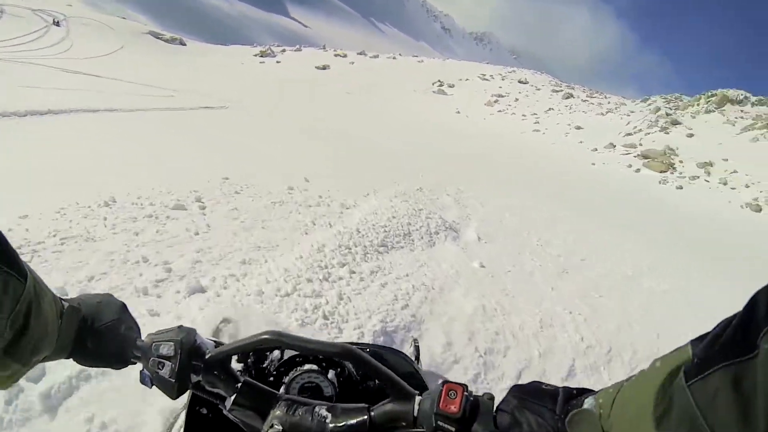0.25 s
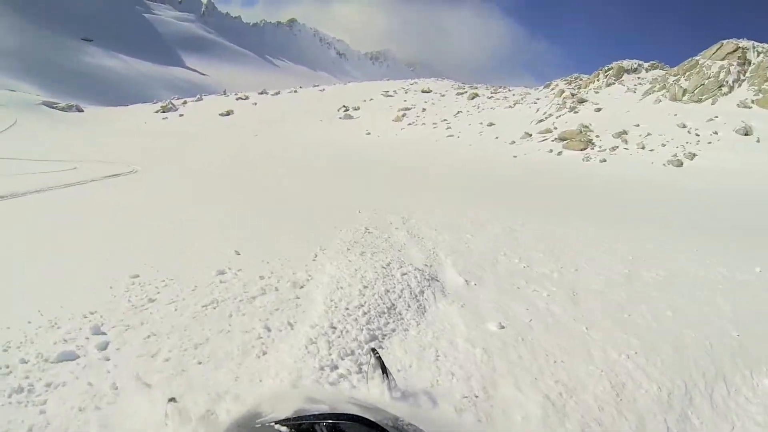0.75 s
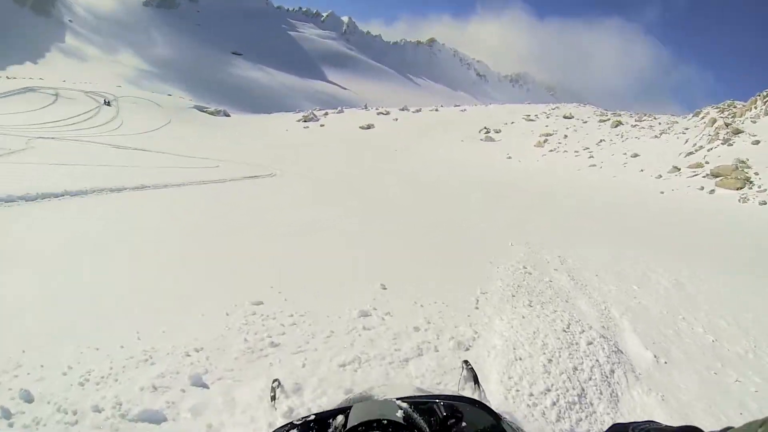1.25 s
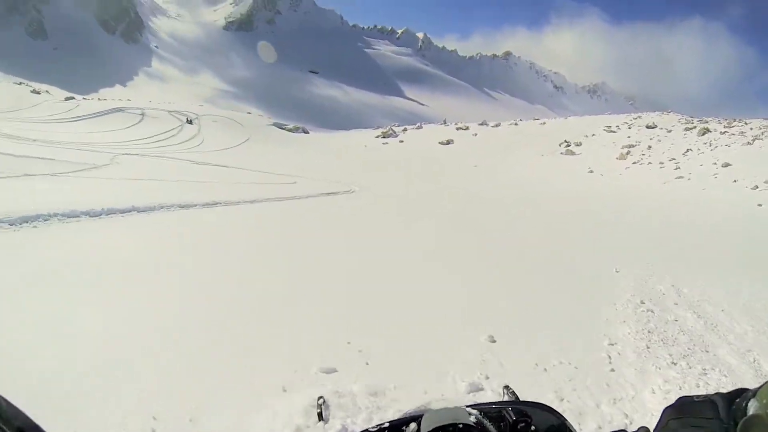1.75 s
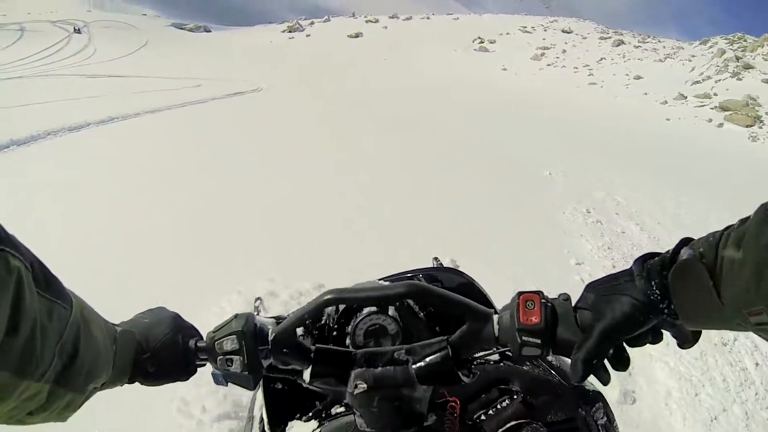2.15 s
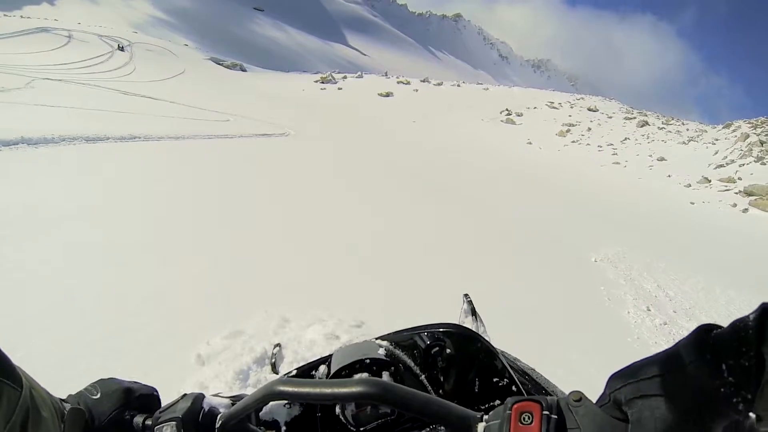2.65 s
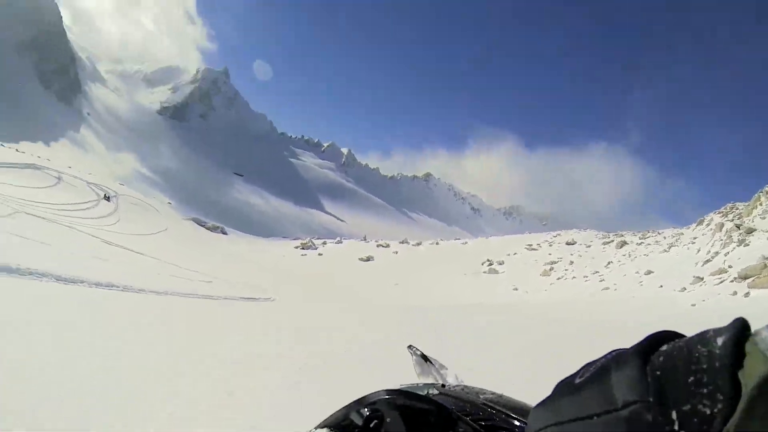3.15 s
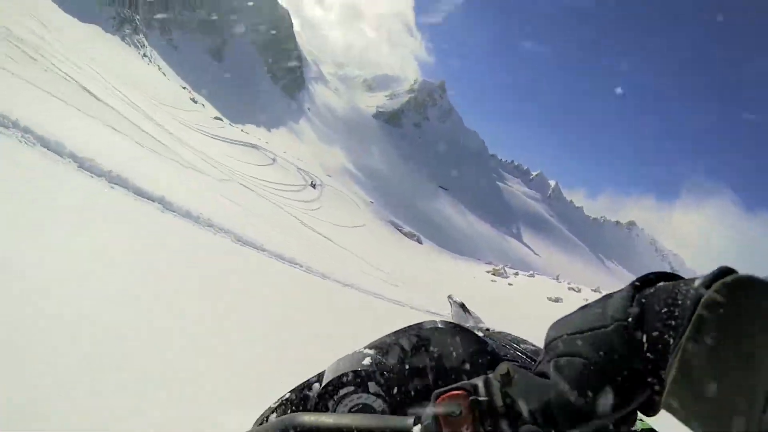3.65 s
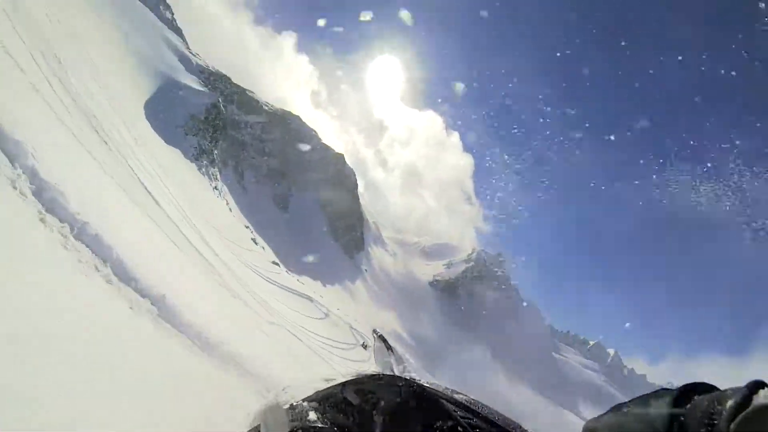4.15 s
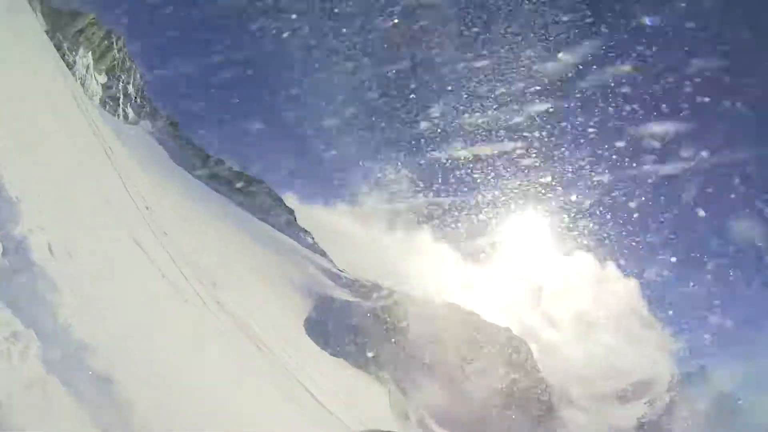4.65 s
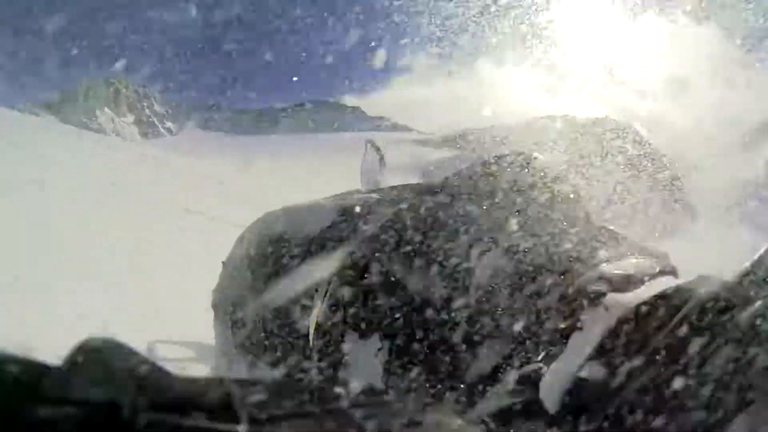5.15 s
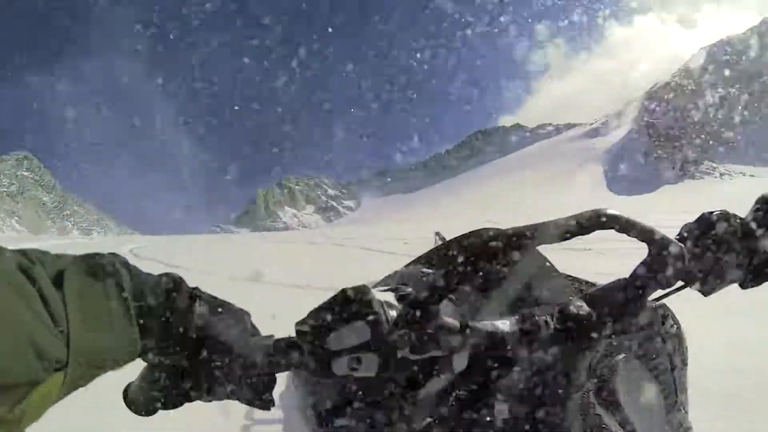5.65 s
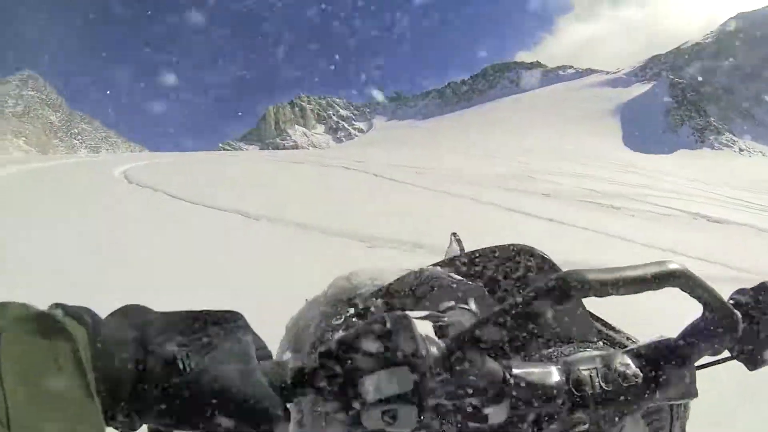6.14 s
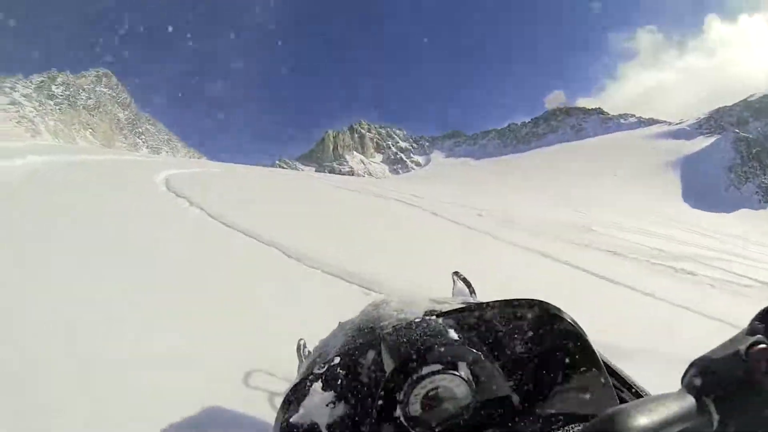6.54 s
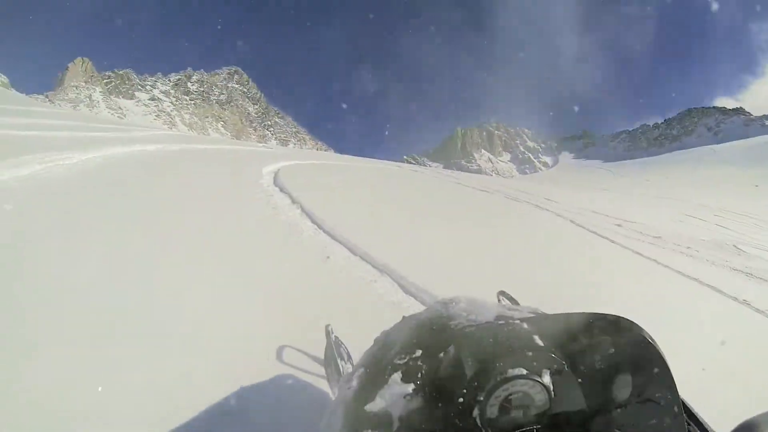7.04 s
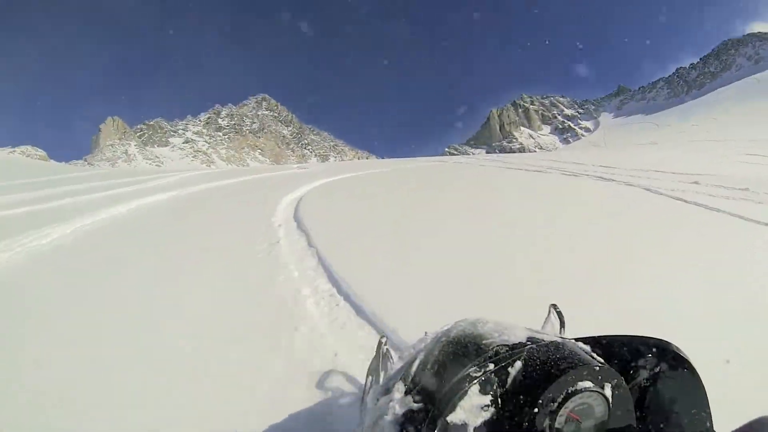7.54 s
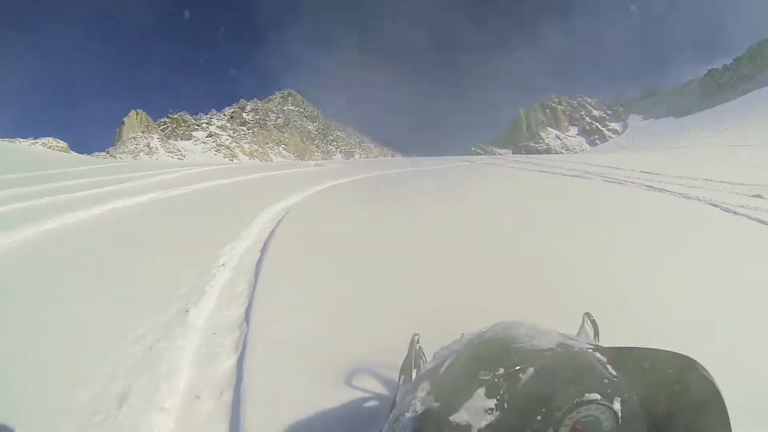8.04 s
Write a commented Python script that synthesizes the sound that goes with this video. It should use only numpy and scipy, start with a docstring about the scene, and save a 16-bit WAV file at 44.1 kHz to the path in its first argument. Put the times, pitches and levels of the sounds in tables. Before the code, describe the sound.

An enclosed microphone worn by the rider hears low wind buffeting and a soft uneven two-stroke idle with loose clutch chatter. After several solid knocks and a burst of tiny ticks, the throttle opens: pitch sweeps up within a second into a loud, steady full-load drone, rough roar and resonant whine. Gusts and a crackling spray of snow cross it around five seconds; the engine stays pinned outdoors on snow.

```python
"""Snowmobile climbing in deep snow

A two-stroke twin snowmobile idles in the wind, then takes full throttle and climbs through deep snow.
The exhaust drones on low crank orders (tones at whole multiples of the crankshaft's turning rate);
higher orders whine as they run through resonances of the rider's camera housing. Shaped noise makes
the wind, clatter, roar and rasp; brief low waves make the wind's thumps. Gear knocks as the rider settles,
wavering tones make the track hum, and random clicks make the patter of thrown snow on the housing."""
import sys
import numpy as np
from scipy import signal
from scipy.fft import rfft, irfft
from scipy.io import wavfile

SR = 44100
rng = np.random.default_rng(int(sys.argv[2]) if len(sys.argv) > 2 else 0)


def int16_out(signal):
    """Quantize to a 16-bit WAV file."""
    q = np.round(np.clip(np.atleast_2d(signal).T, -1, 1) * 32767)
    wavfile.write(sys.argv[1], SR, q.astype(np.int16))


N = 365588
TIME = np.arange(N) / SR  # seconds


def gain_of(db):
    """Turns decibels into amplitude."""
    return 10 ** (np.asarray(db) / 20)


def curve(rows, axis=1):
    """Joins one column of a table with straight lines, giving a value at every sample."""
    rows = np.asarray(rows)
    return np.interp(TIME, rows[:, 0], rows[:, axis])


def read(points, hz):
    """Reads a spectrum in dB, joining its points along a log-frequency axis."""
    point_hz, db = np.transpose(points)
    return np.interp(np.log(hz + 1), np.log(point_hz + 1), db)


def evened(x):
    """Scales a sound to rms 1."""
    return x / np.sqrt(np.mean(x ** 2) + 1e-20)


def drift(rate, size=4096):
    """Slow random wandering of rms 1, changing up to about rate times a second."""
    hz = np.fft.rfftfreq(size, N / SR / size)
    slow = irfft(rfft(rng.standard_normal(size)) * np.exp(-(hz / rate) ** 2))
    return np.interp(TIME, np.linspace(0, N / SR, size), evened(slow))


def swell(middle_s, length_s):
    """A smooth rise and fall, at half height or more for the given length."""
    return 2 ** -np.minimum((2 * (TIME - middle_s) / length_s) ** 2, 40)


def bursts(rows, base_db):
    """Adds the power of brief swells to a base level and gives the amplitude."""
    power = gain_of(base_db) ** 2
    for middle_s, length_s, db in rows:
        power = power + (gain_of(db) * swell(middle_s, length_s)) ** 2
    return np.sqrt(power)


def puffs(cycles, depth):
    """Noise that swells once in every cycle."""
    return rng.standard_normal(N) * np.exp(depth * np.cos(2 * np.pi * cycles))


# resonances of the camera housing: pitch_hz, width_hz, lift_db
HOUSING_RESONANCES = [(1290, 267, 7), (1583, 426, 20), (2506, 590, 5), (3194, 406, 8), (4700, 78, 6.5),
                      (5630, 520, 3.5), (7730, 730, 6), (10450, 820, 4.5), (12800, 1300, 0)]


def housing(hz):
    """The housing lifts the sound around each of its resonances; the lifts add up in dB."""
    return sum(db * 2 ** (-(2 * (hz - f) / width) ** 2) for f, width, db in HOUSING_RESONANCES)


def response(colour, size=4096):
    """The ring of one click given a source's colour and heard through the housing."""
    hz = abs(np.fft.fftfreq(size, 1 / SR))
    log_gain = np.log(gain_of(read(colour, hz) + housing(hz)))
    # this choice of phase keeps the sound from starting before the click
    spectrum = np.exp(signal.hilbert(log_gain).conj())
    return np.fft.ifft(spectrum).real[:size // 2]


def coloured(x, colour):
    """Gives a raw sound its colour through the housing, at rms 1."""
    return evened(signal.oaconvolve(x, response(colour))[:N])


# air on the microphone between gusts, before its sway: time_s, level_db
BREEZE_LEVEL = [(0, -30), (1.6, -30.5), (2.7, -30.5), (5.5, -28), (8.29, -34)]
# gusts on the microphone: middle_s, length_s, level_db
WIND_GUSTS = [(.2, 0.73, -25.5), (1.21, 0.12, -28), (2.2, 0.53, -26), (3.14, 0.15, -22), (3.81, .09, -22),
              (4.22, 0.41, -26), (4.48, 0.065, -19.5), (4.66, 0.05, -24), (5.09, 0.097, -15),
              (5.49, 0.12, -21.5), (6.15, 0.074, -29)]
# tone of the wind before the housing: pitch_hz, relative_db
WIND_TONE = [(5, -6), (15, 2), (35, -1), (60, -4.5), (100, -12), (180, -21), (400, -55), (1200, -61),
             (3000, -96)]


def wind(lump_db=1.0, sway_db=1.5):
    """Moving air buffets the microphone: lumpy low noise with a swaying breeze and gusts."""
    strength = bursts(WIND_GUSTS, curve(BREEZE_LEVEL) + sway_db * drift(4.9))
    lumpy_noise = rng.standard_normal(N) * gain_of(lump_db * drift(56))
    return strength * coloured(lumpy_noise, WIND_TONE)


# short low thumps of wind on the microphone, level before the fade shape: middle_s, level_db, pitch_hz
WIND_BUFFETS = [(0.246, -13, 50.3), (.402, -10.5, 59), (1.185, -19, 170), (1.223, -17, 109),
                (1.737, -16, 109), (1.91, -15.5, 205), (1.916, -15.5, 60), (2.076, -12, 39.7),
                (2.141, -15.5, 105), (2.365, -5, 91), (3.006, -18, 90), (3.386, -15, 85), (3.553, -15, 80),
                (5.108, -19, 65), (5.487, -8, 42.4), (6.275, -25, 80)]


def buffets(fade_cycles=0.35):
    """Each buffet of wind pushes the air at the microphone in and out about once, a short low thump."""
    out = np.zeros(N)
    for middle_s, db, hz in WIND_BUFFETS:
        cycles = (TIME - middle_s) * hz
        near = abs(cycles) < 2
        fade = np.exp(-(cycles[near] / fade_cycles) ** 2)
        out[near] -= gain_of(db) * np.sin(2 * np.pi * cycles[near]) * fade
    return out


# plumes of snow thrown on the housing, before the overall lift: middle_s, length_s, level_db
SNOW_PLUMES = [(0, 0.17, -53), (2.24, 0.41, -60), (3.13, .2, -56), (3.82, 0.52, -47), (4.64, 0.17, -38.5),
               (4.86, 0.26, -36), (5.04, .07, -38), (7.7, 0.41, -65)]
# tone of the grains before the housing: pitch_hz, relative_db
SPRAY_TONE = [(500, -34), (1600, -15), (3500, 14), (5000, 6), (8000, -2), (11000, -5.5), (15000, -9)]


def spray(powder_db=-64, lift_db=1, clump_db=2, spread_db=4, grains_per_s=2500):
    """Snow grains of many sizes patter on the housing in clumps, over a base of fine powder."""
    size_db = spread_db * np.minimum(rng.exponential(1, N), 4) + clump_db * drift(22)
    push = gain_of(size_db) * rng.choice([-1, 1], N)
    grains = push * (rng.random(N) < grains_per_s / SR)
    strength = gain_of(lift_db) * bursts(SNOW_PLUMES, powder_db)
    return strength * coloured(grains, SPRAY_TONE)


def hits(rows, colour, scuff, scuff_s, size=600):
    """Each hit is a click and a brief fading scuff of noise that ring the housing."""
    out, ring = np.zeros(N), response(colour)
    for start_s, peak_db in rows:
        contact = scuff * rng.standard_normal(size) * np.exp(-np.arange(size) / SR / scuff_s)
        contact[0] += 1
        sound = signal.fftconvolve(contact, ring)
        part = out[round(start_s * SR):][:len(sound)]  # adding here adds into out
        part += gain_of(peak_db) * sound[:len(part)] / abs(sound).max()
    return out


# knocks of rider and gear: start_s, peak_db
GEAR_KNOCKS = [(1.178, -27.5), (1.281, -28), (1.4915, -21), (1.545, -31), (1.581, -28), (1.822, -36),
               (1.909, -19), (2.058, -38), (2.069, -20.5), (2.076, -23), (2.118, -24), (2.1925, -11.5)]
# tone of a knock before the housing: pitch_hz, relative_db
KNOCK_TONE = [(80, -4), (300, -9), (700, 11), (1200, -2.5), (1480, -3), (1700, 1.5), (2200, -2),
              (3500, -9.5), (6000, -30), (14000, -57)]


def knocks():
    """Rider and gear strike solid parts: short knocks that ring the housing."""
    return hits(GEAR_KNOCKS, KNOCK_TONE, scuff=0.26, scuff_s=0.0016)


# sharp ticks of icy grains: start_s, peak_db
ICE_TICKS = [(.722, -57), (1.094, -45), (2.229, -46), (2.242, -29.5), (2.257, -32), (2.293, -24.5),
             (2.299, -33), (2.321, -31), (2.331, -38), (2.343, -38), (2.36, -30.5), (4.61, -26),
             (4.668, -21), (5.39, -33)]
# tone of a tick before the housing: pitch_hz, relative_db
TICK_TONE = [(300, -16), (1600, -25), (3500, 3), (4500, 5), (7000, 0), (8300, -14), (10500, -23),
             (15000, -26)]


def ticks():
    """Icy grains strike with bright, sharp ticks that ring the housing."""
    return hits(ICE_TICKS, TICK_TONE, scuff=0.44, scuff_s=0.0014)


def hum(rows, unsteady):
    """A low tone of the running gear that glides with its table and wavers in strength and phase."""
    phase = 2 * np.pi * np.cumsum(curve(rows)) / SR
    strength = np.sqrt(2) * gain_of(curve(rows, axis=2)) * (1 + unsteady * drift(11))
    return strength * np.sin(phase + unsteady * drift(3.6))


# track lugs, before wavering: time_s, pitch_hz, level_db
TRACK_LUGS = [(3, 169, -79), (3.3, 200, -45), (4, 258.4, -33), (5, 240, -37), (5.75, 195, -37),
              (6.7, 210, -35), (7.5, 203.6, -38.5), (8.29, 211.7, -36)]
# low thrum of the chassis over the snow, before wavering: time_s, pitch_hz, level_db
CHASSIS_THRUM = [(3.6, 44.8, -60), (3.85, 47, -40), (4.4, 46, -21.5), (4.65, 48.7, -63), (6.1, 76.2, -39),
                 (6.4, 78.7, -37.5), (7.2, 81.5, -36.5), (8.29, 85.4, -40.5)]


def track():
    """Lugs passing the drive wheel make a gliding, wavering hum; the chassis thrums below them."""
    return hum(TRACK_LUGS, unsteady=0.17) + hum(CHASSIS_THRUM, unsteady=0.11)


# clutch rattle: time_s, level_db
RATTLE_LEVEL = [(0, -46), (1, -50), (1.62, -41.5), (2.3, -49), (2.75, -64)]
# tone of the rattle before the housing: pitch_hz, relative_db
RATTLE_TONE = [(500, -32.5), (1400, -11.5), (1640, 0), (1850, 3), (2200, -15), (3300, -9), (4200, -25.5),
               (12000, -34)]


def rattle(turns, depth=0.8, uneven_db=1.8):
    """The slack clutch chatters once a turn, never twice alike."""
    chatter = puffs(turns, depth) * gain_of(uneven_db * drift(20))
    return gain_of(curve(RATTLE_LEVEL)) * coloured(chatter, RATTLE_TONE)


# clatter at idle: time_s, level_db
IDLE_LEVEL = [(0, -42), (.09, -35.5), (.17, -40), (.6, -42), (1.3, -43), (1.95, -40.5), (2.3, -33),
              (2.42, -41.5), (2.55, -34.5), (2.8, -38)]
# tone of the clatter before the housing: pitch_hz, relative_db
IDLE_TONE = [(30, 12), (130, 20), (250, 18), (400, 15.5), (700, 6.5), (1000, 7.5), (1600, -1.5), (2100, 3),
             (3000, -6.5), (4000, -12), (6500, -19), (9000, -26), (15000, -33.5)]


def idle(speed, turns, lope=0.087, flutter_db=1.5, beat_db=-40, fade_turns_per_s=45):
    """Loping clatter, and a soft exhaust beat whose fourth order rings the pipe until the throttle opens."""
    fluttering = puffs(turns, lope) * gain_of(flutter_db * drift(60))
    clatter = gain_of(curve(IDLE_LEVEL)) * coloured(fluttering, IDLE_TONE)
    beat = 0
    for order, db in {2: -9, 4: 0, 6: -12, 8: -12}.items():
        strength = np.sqrt(2) * gain_of(db) * (1 + drift(11) / 2)
        beat = beat + strength * np.cos(2 * np.pi * order * turns + drift(4.5) / 2)
    fade = 1 / (1 + (speed / fade_turns_per_s) ** 10)  # the beat goes as the engine picks up
    return clatter + gain_of(beat_db) * beat * fade


# engine load, a level that the roar, rasp, overtones, whine and
# fourth and sixth orders follow: time_s, load_db
ENGINE_LOAD = [(2.45, -78), (2.54, -43.5), (2.6, -47.5), (2.71, -34), (2.8, -32.5), (3.06, -29.5),
               (3.33, -32), (3.85, -30.5), (4.43, -31.5), (5.02, -29), (5.12, -31.5), (5.7, -31.5),
               (6.05, -29.5), (8.28, -30)]
FULL_LOAD_DB = -28.5  # the load at which the pipe and ring tables hold
# rough combustion roar above the load: time_s, extra_db
ROAR_EXTRA = [(2.7, 7.5), (2.82, 12), (3.33, 6.5), (4.07, 8), (4.35, 6), (4.62, 11), (4.8, 9), (5.3, 8),
              (5.57, 3.5), (5.7, 7), (6.2, 6), (6.65, 11), (7.25, 7.5), (7.42, 9), (8.28, 4.5)]
# tones of the roar and the rasp before the housing: pitch_hz, relative_db
ROAR_TONE = [(500, -33.5), (1050, -16.5), (1400, -9), (1800, -2), (2100, -13), (3200, -43)]
RASP_TONE = [(40, -16), (130, 5), (250, 6), (400, -0.5), (550, -1.5), (1000, 1.5), (1550, -15.5),
             (2100, 1.5), (3000, -3.5), (4000, -7.5), (6500, -16), (9000, -23), (12000, -28.5),
             (15000, -39)]


def combustion(speed, turns, roar_depth=0.41, rasp_depth=0.073, uneven_db=1.13,
               rasp_db=2, dull_db=-14, split_hz=4500):
    """Gas noise in uneven puffs: a roar once a turn, and a rasp at each firing that brightens with speed."""
    load_db = curve(ENGINE_LOAD)
    roar = gain_of(load_db + curve(ROAR_EXTRA)) * coloured(puffs(turns, roar_depth), ROAR_TONE)
    gas = puffs(2 * turns, rasp_depth)  # two firings a turn
    body = signal.sosfiltfilt(signal.butter(2, split_hz, fs=SR, output="sos"), gas)
    treble = (gas - body) * gain_of(dull_db * (1 - speed / speed.max()))
    rasp = gain_of(load_db + rasp_db) * coloured(body + treble, RASP_TONE)
    return gain_of(uneven_db * drift(65)) * (roar + rasp)


# overtones before the housing, load, fading and odd-order cut: pitch_hz, level_db
OVERTONE_LEVELS = [(60, -43), (125, -36.5), (400, -23.5), (600, -41), (1000, -40), (1350, -41.5),
                   (1650, -44), (1900, -44.5), (2300, -39.5), (2700, -47), (3300, -48.5), (4000, -55.5),
                   (5500, -56), (8000, -68.5)]


def overtones(speed, turns, full_load_db=-29, fade_db=5.0, odd_db=-5, revving_odd_db=-10,
              revving_db=-0.5, waver=0.37, count=66):
    """More orders follow the load and fade in and out; odd and high ones firm up only near top speed."""
    grid_hz = np.linspace(0, SR / 2, 4096)
    colour = read(OVERTONE_LEVELS, grid_hz) + housing(grid_hz)
    slack = 1 - speed / speed.max()  # 0 at top speed
    out = np.zeros(N)
    for order in np.setdiff1d(np.arange(1, count), [2, 3, 4, 6, 10, 12, 13]):
        db = np.interp(order * speed, grid_hz, colour)
        db += fade_db * np.minimum(drift(3.04), 1)
        db += (odd_db + revving_odd_db * slack) * (order % 2)
        db += revving_db * slack * order
        phase = 2 * np.pi * (order * turns + rng.random()) + waver * drift(6.7)
        out += gain_of(db) * np.cos(phase)
    return np.sqrt(2) * out * gain_of(curve(ENGINE_LOAD) - full_load_db)


# one order briefly swells or sinks: middle_s, length_s, crank_order, change_db
ORDER_SWELLS = [(2.85, 0.073, 18, 7), (3.15, 0.11, 14, 8.5), (3.206, .11, 12, 12), (3.4, 0.091, 12, -7),
                (3.5, .4, 18, -8), (3.786, 0.7, 12, 2), (3.793, 0.37, 20, 5), (4.55, 0.39, 4, -8.5),
                (4.56, 0.62, 18, 7.5), (4.673, 0.9, 12, -9), (4.8, 0.25, 6, 12), (4.897, .08, 12, 7.5),
                (5.05, 0.41, 4, 5), (5.117, 0.24, 19, 10), (5.196, 0.16, 12, 8), (5.26, 0.16, 14, 13),
                (5.443, 0.16, 13, -14), (5.479, 0.25, 12, 10), (5.826, 0.21, 15, 0.5), (6.62, 0.3, 13, 5.5),
                (7.041, 0.24, 12, -13), (7.2, 0.67, 19, 0), (7.48, 0.23, 13, 3.5), (8.05, .5, 25, 4)]


def swelling(order):
    """The brief rises and falls of one crank order, in dB."""
    return sum(db * swell(s, length) for s, length, k, db in ORDER_SWELLS if k == order)


# sharp resonances excited by passing orders, at full load and top speed: pitch_hz, width_hz, level_db
SHARP_RINGS = [(753.6, 6.2, -36), (1222, 64, -28), (1418, 36, -28), (1494.3, 37, -15), (1515, 30, -19),
               (1597, 84, -17.5), (1730, 30, -27), (1758, 30, -25.5), (1871, 20, -28.5), (2153, 23, -37.5),
               (2241, 45, -29.5), (2320, 21.6, -31.5), (2520, 20, -36), (3157, 40, -41.5),
               (3343, 66, -43.5), (3610, 46, -41), (4530, 55, -46.5), (5504, 34, -45)]


def whine(speed, turns, shimmer=0.043, waver=0.43, fade_db=1.5, revving_db=-12, count=46):
    """Each order sings as speed carries it through a sharp resonance; neighbours beat at the crank rate."""
    grid_hz = np.arange(6000)
    power = 0
    for hz, width, db in SHARP_RINGS:
        power = power + gain_of(db) ** 2 / (1 + (grid_hz - hz) ** 2 / (width / 2) ** 2 / 2) ** 2
    ring = np.sqrt(power)
    tone = 0
    for order in range(6, count):
        strength = np.interp(order * speed, grid_hz, ring)
        strength = strength * gain_of(fade_db * drift(5.2) + swelling(order))
        phase = 2 * np.pi * (order * turns + rng.random()) + waver * drift(2.17)
        tone = tone + strength * np.cos(phase)
    drive_db = curve(ENGINE_LOAD) - FULL_LOAD_DB + revving_db * (1 - speed / speed.max())
    return np.sqrt(2) * gain_of(drive_db) * (1 + shimmer * drift(35)) * tone


# exhaust firing tone, two beats a turn, before wobble: time_s, level_db
FIRING_LEVEL = [(2.4, -62), (2.58, -23), (2.77, -29), (3.03, -25.5), (3.14, -18), (3.3, -21), (4.6, -21),
                (4.89, -17), (5.11, -23.5), (5.6, -25.5), (6.39, -20), (7.82, -22), (8.28, -21)]
# third order, from the two cylinders firing unequally, before wobble: time_s, level_db
UNEQUAL_LEVEL = [(2.45, -65), (2.85, -43), (3.12, -25), (3.32, -32.5), (5.6, -32), (6.1, -25), (6.89, -30),
                 (7.43, -25.5), (8.28, -28.5)]
# exhaust pipe's response to the higher firing orders at full load: pitch_hz, level_db
PIPE_RESPONSE = [(200, -39), (320, -24), (395, -18), (470, -26.5), (494, -35), (505, -38.5), (560, -29),
                 (760, -42.5)]


def drone(speed, turns, shimmer=0.043, sixth_db=-4, load_share=0.56):
    """The exhaust's low orders: ragged while the engine picks up, cleaner near top speed."""
    load_db = load_share * (curve(ENGINE_LOAD) - FULL_LOAD_DB)
    fourth = load_db + read(PIPE_RESPONSE, 4 * speed) + swelling(4)
    sixth = load_db + read(PIPE_RESPONSE, 6 * speed) + sixth_db
    orders = {2: curve(FIRING_LEVEL), 3: curve(UNEQUAL_LEVEL), 4: fourth, 6: sixth}
    stumble = 0.9 * (1 - speed / speed.max())
    tone = 0
    for order, db in orders.items():
        depth = (shimmer + stumble) * np.sqrt(order) / 4
        wobble = 1 + depth * (drift(60) + 1j * drift(66))  # shakes both strength and phase
        spin = np.exp(2j * np.pi * (order * turns + rng.random()))
        tone = tone + gain_of(db) * (wobble * spin).real
    return np.sqrt(2) * tone


# crankshaft before jitter: the idle sags, then the throttle opens: time_s, turns_per_s
PICKUP_SPEED = [(0, 34), (2.15, 28), (2.4, 32.5), (2.5, 39), (2.65, 60.4), (2.75, 79.5), (2.9, 92.5),
                (3.08, 113)]
# crankshaft before jitter at full throttle, pulled down by the snow: time_s, turns_per_s
HELD_SPEED = [(3.2, 121.5), (3.28, 125.6), (3.35, 127.3), (3.48, 127.6), (3.92, 125.7), (4.19, 126.8),
              (4.46, 125.2), (4.63, 125.3), (4.7, 126.2), (4.83, 126.6), (5.2, 122.3), (5.51, 121.9),
              (5.74, 117.4), (5.87, 117.4), (6.16, 119.9), (6.42, 118.6), (6.57, 120.7), (7.1, 122.3),
              (7.18, 121.7), (7.5, 122.5), (7.79, 124.5), (7.91, 123.7), (8.26, 125.3), (8.29, 124.1)]


def scene(jitter=0.0015, catch_jitter=0.019):
    """One crankshaft drives every engine layer; wind, snow and knocks join at the camera."""
    speed = curve(PICKUP_SPEED + HELD_SPEED)
    unsteady = jitter + catch_jitter * (1 - speed / speed.max())  # firing is less regular at low speed
    turns = np.cumsum(speed * (1 + unsteady * drift(39.5))) / SR
    surroundings = wind() + buffets() + spray() + knocks() + ticks() + track()
    engine = rattle(turns) + idle(speed, turns) + combustion(speed, turns)
    tones = overtones(speed, turns) + whine(speed, turns) + drone(speed, turns)
    return (surroundings + engine + tones)[None]


def record(dry, edge_hz=15250):
    """Removes the treble above the edge with a steep low-pass filter."""
    low_pass = signal.firwin(511, edge_hz, window=("kaiser", 9), fs=SR)
    return signal.oaconvolve(dry, low_pass[None], "same")


dry = scene()
out = record(dry)
int16_out(out)
```